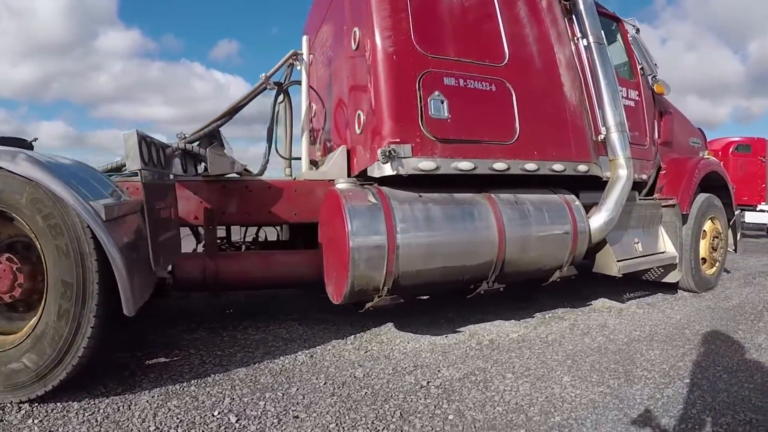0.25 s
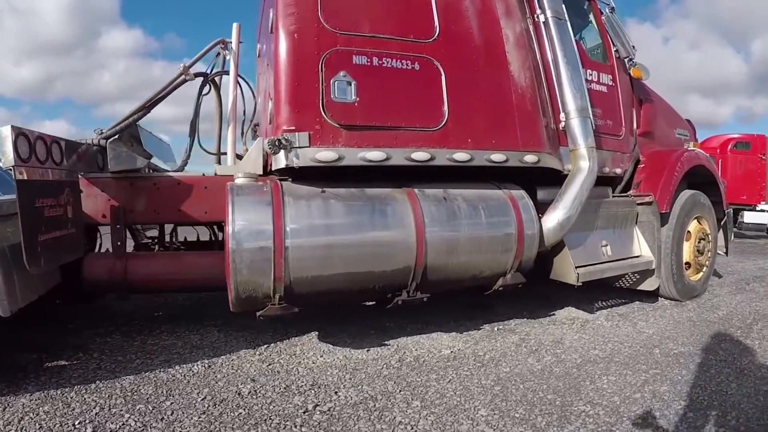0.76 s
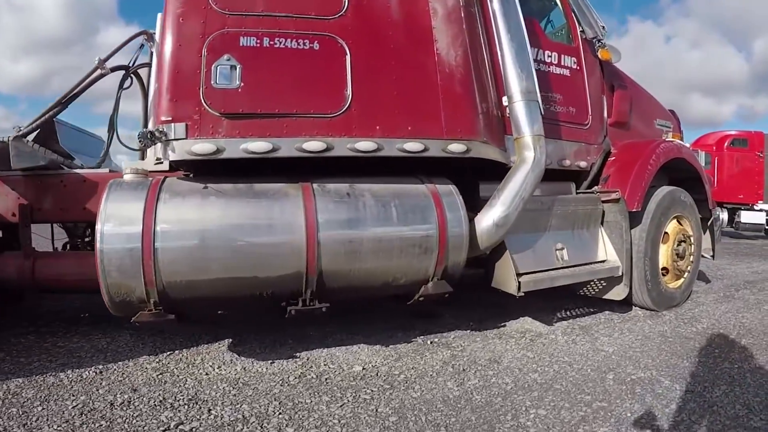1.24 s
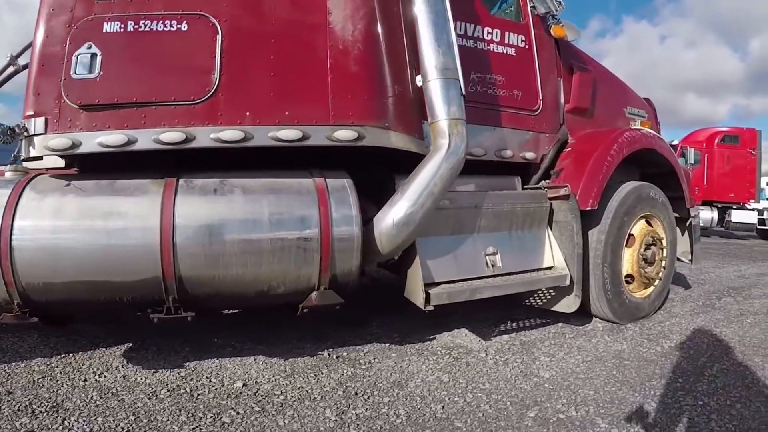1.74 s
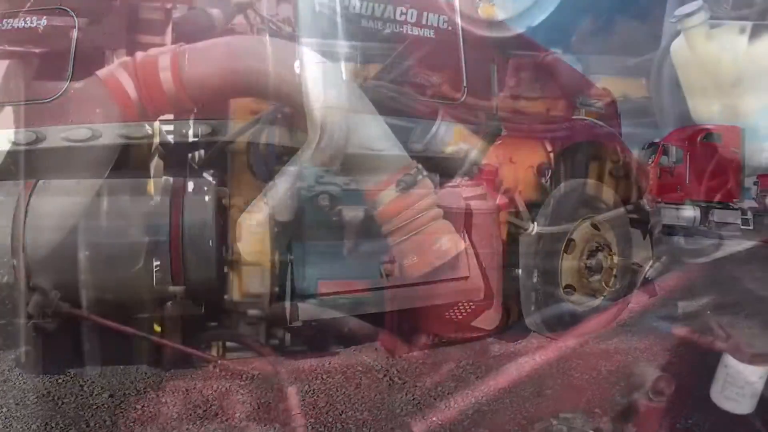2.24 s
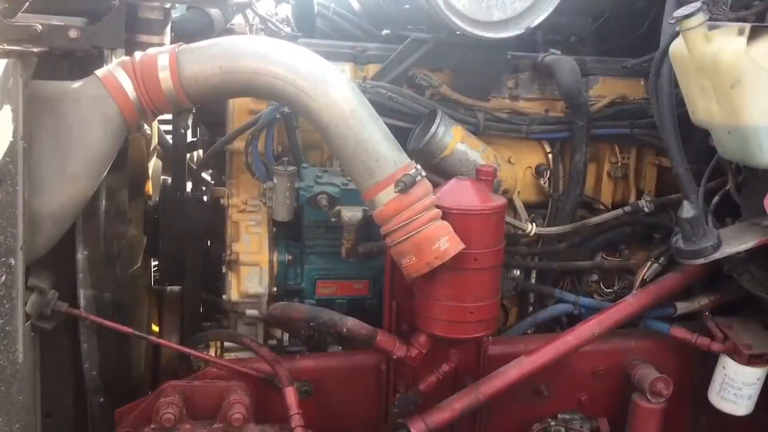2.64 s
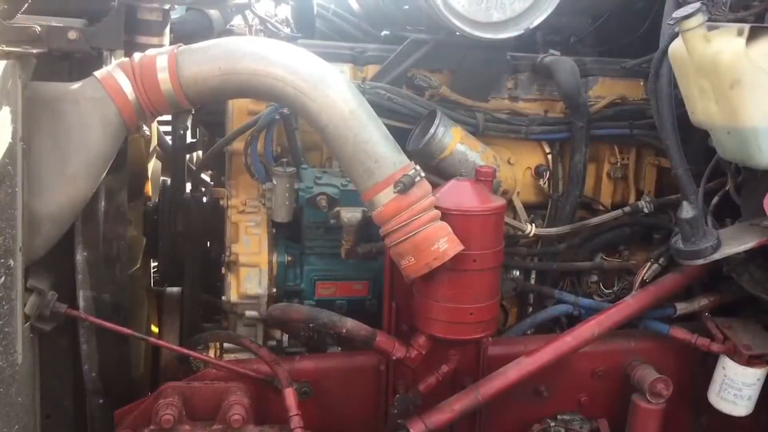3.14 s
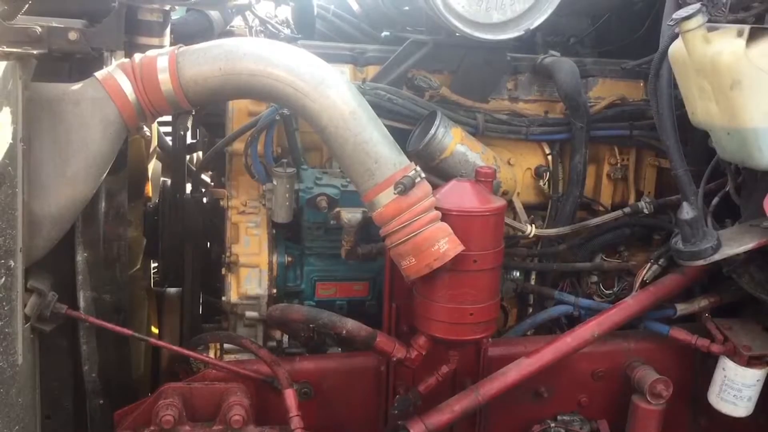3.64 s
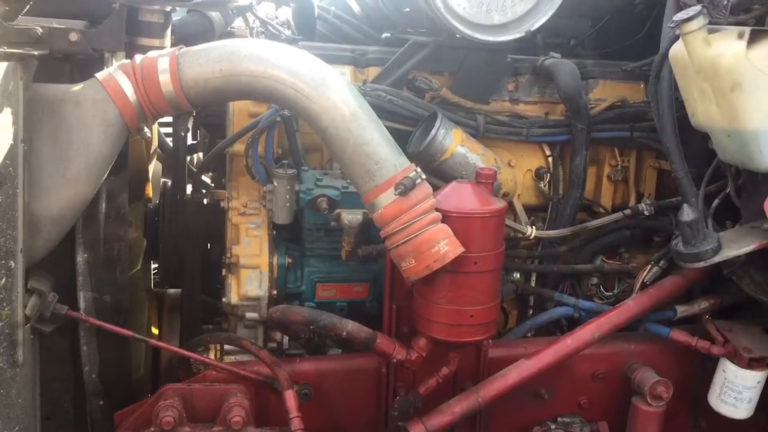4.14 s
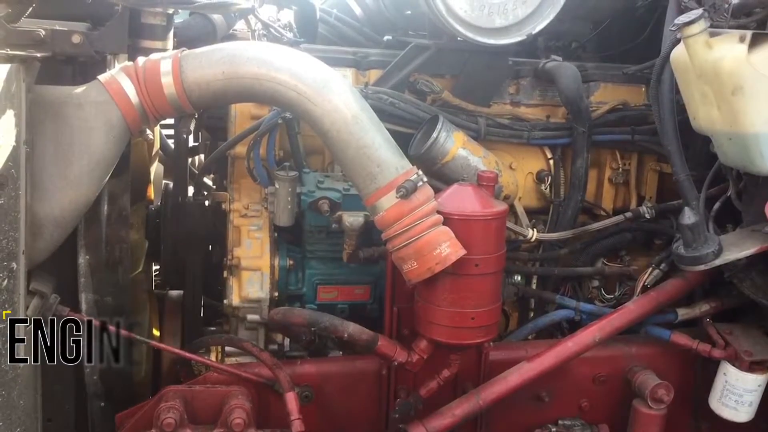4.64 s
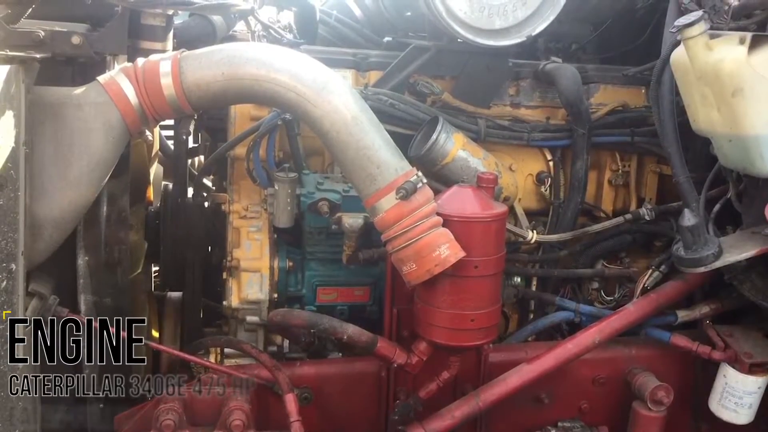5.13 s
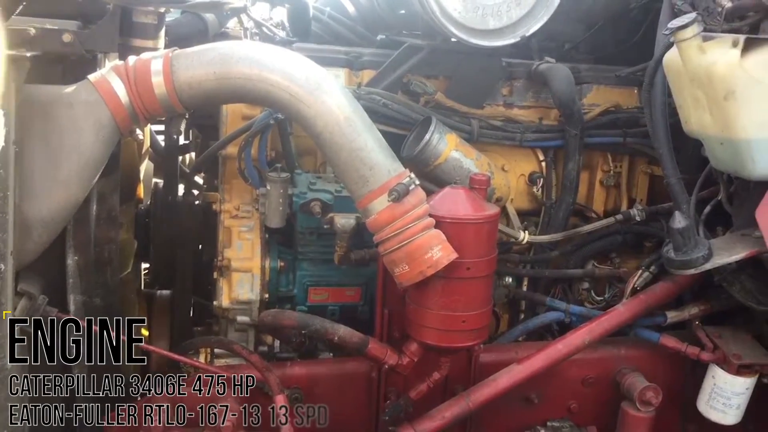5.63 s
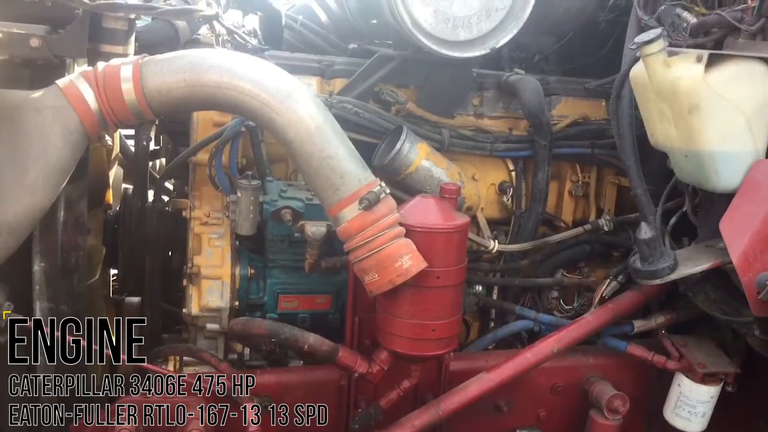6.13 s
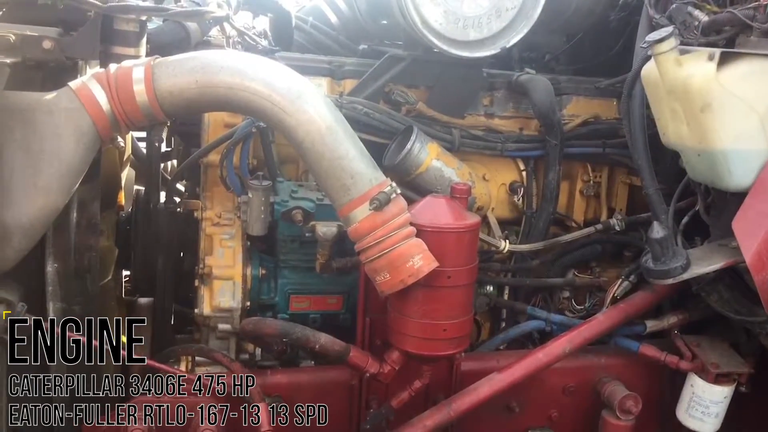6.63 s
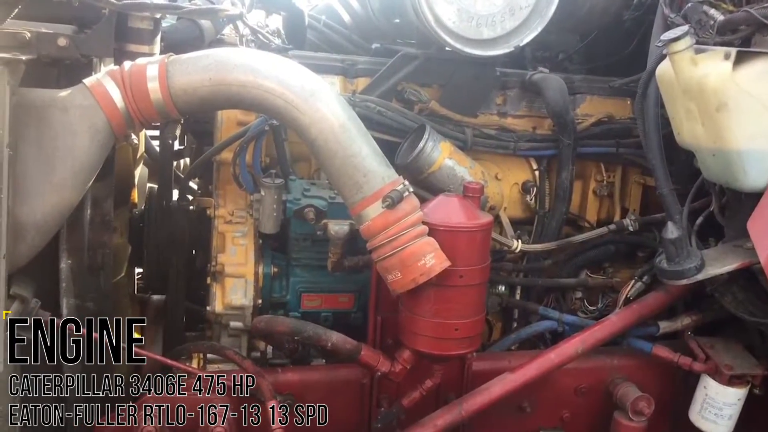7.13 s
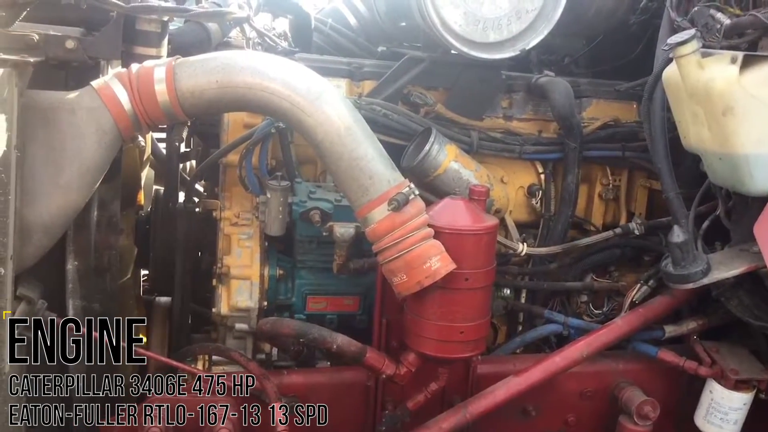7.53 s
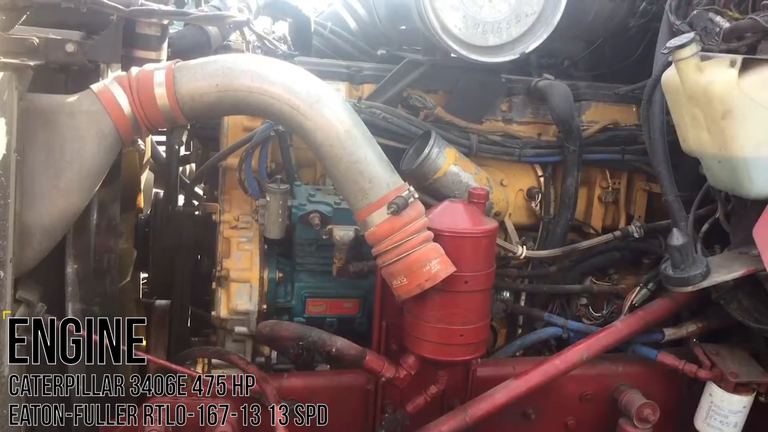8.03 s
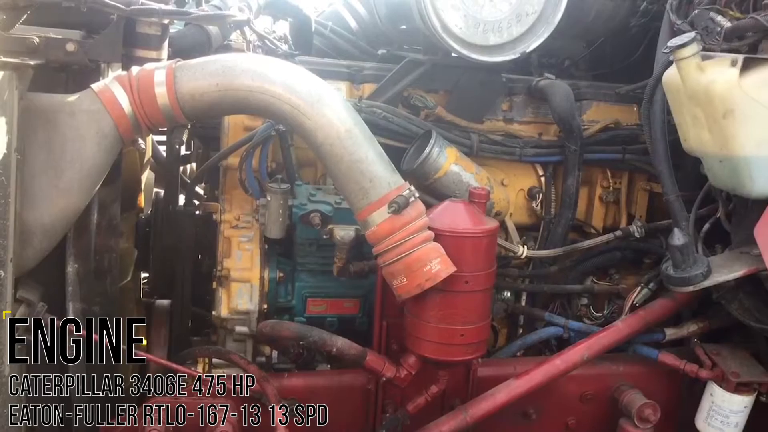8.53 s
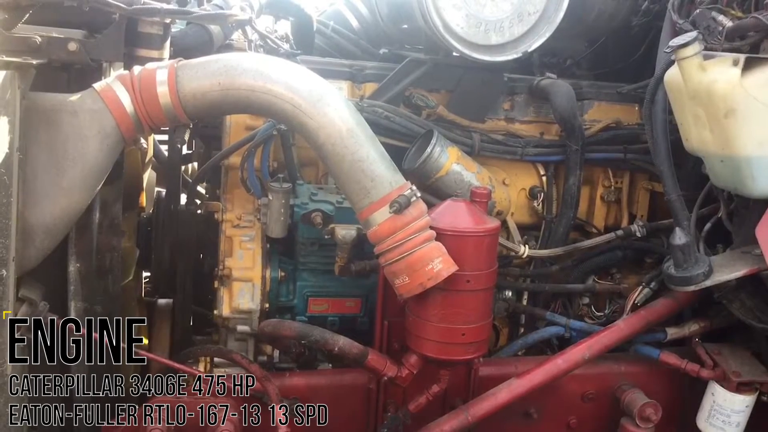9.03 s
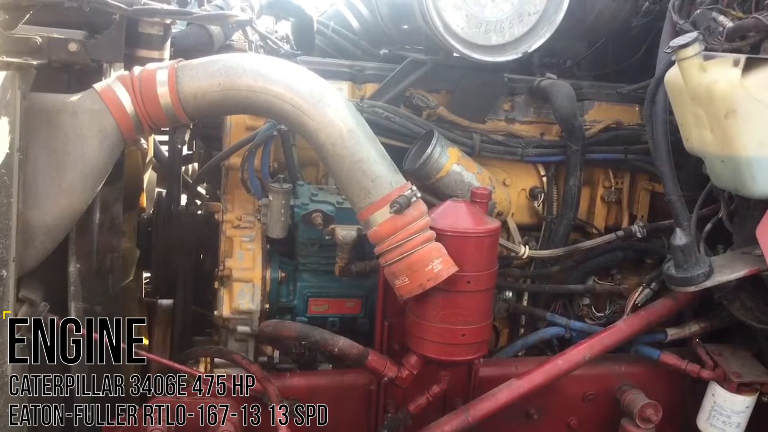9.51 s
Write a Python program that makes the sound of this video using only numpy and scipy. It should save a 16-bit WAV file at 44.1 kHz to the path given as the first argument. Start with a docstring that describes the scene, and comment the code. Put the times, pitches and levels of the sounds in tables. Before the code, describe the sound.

First comes deep, uneven wind buffeting on an outdoor microphone, with barely audible gravel steps, clicking pebbles and a thin distant whine. Around two seconds a heavy six-cylinder diesel fades in as the wind stops. Heard close, it idles evenly with hard metallic clatter, injector ticks, low pulsing drone and fan noise, with an occasional heavier low beat.

```python
"""Wind buffets a microphone in a gravel yard, with a few faint steps, clicking stones and a thin far whine.
As the wind dies, a big six-cylinder diesel idling near 700 rpm fades in over the quiet air of the yard.
Wind, fan and air are filtered noise; steps are noise grains; stones and rough gust tops are ringing noise.
The engine sums noise bursts and swelling tones timed by the firings, a drone of sines on the crank orders,
and resonances of the iron."""
import sys
import numpy as np
from scipy import signal
from scipy.fft import rfft, irfft
from scipy.io import wavfile
from scipy.ndimage import uniform_filter1d

SR = 44100
rng = np.random.default_rng(int(sys.argv[2]) if len(sys.argv) > 2 else 0)


def waveform_to_disk(signal):
    """Save audio, clipped to [-1, 1], as 16-bit WAV at the path in sys.argv[1]."""
    frames = np.transpose(np.atleast_2d(signal))
    scaled = np.clip(frames, -1, 1) * 32767
    samples = np.round(scaled).astype(np.int16)
    wavfile.write(sys.argv[1], SR, samples)


N = 430857
TIME = np.arange(N) / SR
ENGINE_FADE_START_S = 1.837


def undb(db):
    """Decibels to gain."""
    return 10 ** (np.asarray(db) / 20)


def level(x, db):
    """Scale to an rms level."""
    return x * undb(db) / np.sqrt(np.mean(x ** 2))


def curve(rows):
    """Second column of a table over its first, joined by straight lines in time."""
    rows = np.array(rows)
    return np.interp(TIME, rows[:, 0], rows[:, 1])


def smooth(x, first, second):
    """Two moving averages in turn, lengths in samples."""
    return uniform_filter1d(uniform_filter1d(x, first), second)


def walk(rate_hz):
    """Random levels drawn rate_hz times a second, smoothed twice, rms 1."""
    k = int(SR / rate_hz)
    held = np.repeat(rng.standard_normal(N // k + 1), k)
    return level(smooth(held, k, k)[:N], 0)


def colour(x, spectrum, size=8192):
    """Minimum-phase filter with the given (frequency [Hz], level [dB]) outline, by folding the cepstrum."""
    hz, db = np.transpose(spectrum)
    bins_hz = np.maximum(np.fft.rfftfreq(size, 1 / SR), 1)
    outline_db = np.interp(np.log(bins_hz), np.log(hz), db)
    cepstrum = irfft(np.log(undb(outline_db)))
    cepstrum[1:size // 2] *= 2
    cepstrum[size // 2 + 1:] = 0
    impulse = irfft(np.exp(rfft(cepstrum)))
    return signal.fftconvolve(x, impulse)[:N]


def ring(x, hz, width_hz):
    """One resonance, gain 1 at its centre."""
    return signal.lfilter(*signal.iirpeak(hz, hz / width_hz, fs=SR), x)


def add(track, start_s, sound):
    """Mix a sound into a track at a given time."""
    i = int(np.clip(start_s * SR, 0, N))
    track[i:i + len(sound)] += sound[:N - i]


def engine(count=6):
    """Six cylinders fire in turn, three to a crank turn; the fan blows on between the firings."""
    first_firing_s, drone_lead_s = .0458, .00199
    # firing rate: (time [s], firings per second [Hz])
    firing_rate = [(0, 35), (8.3, 35), (9.8, 35.08)]
    start_hz = firing_rate[0][1]
    fired = np.cumsum(curve(firing_rate)) / SR - first_firing_s * start_hz + .005 * walk(5)
    times = np.interp(np.arange(int(fired[-1]) + 1), fired, TIME)
    firings = [times[k::count] for k in range(count)]
    turns = (fired + drone_lead_s * start_hz) / (count / 2)
    # fan noise: (frequency [Hz], relative density [dB])
    fan_spectrum = [(150, -18), (400, 3.5), (2500, -4.5), (6500, -11.5), (7500, -18.5), (10000, -38),
                    (13500, -28), (15000, -45)]
    fan = colour(rng.standard_normal(N), fan_spectrum)
    sound = (impacts(firings)
             + combustion_knocks(firings)
             + pings(firings)
             + level(drone(turns), -46)
             + level(fan, -54.5)
             + throbs())
    fade = np.clip((TIME - ENGINE_FADE_START_S) / .68, 0, 1) ** .82
    return sound * undb(-.5) * fade


def impacts(firings):
    """Clatter and injector ticks ring the same iron; low thumps and a loose rattle come on top."""
    # cylinders in firing order: (relative clatter [dB], relative injector tick [dB])
    cylinder_levels = [(1.94, 6), (1.5, 0), (1.84, 4.5), (2, 3.5), (2, 4.5), (1.5, 1.5)]
    # spectra: (frequency [Hz], relative density [dB])
    clatter_spectrum = [(180, -21), (350, -13.5), (550, -10.5), (750, -8.5), (950, -4.5), (1250, -4.5),
                        (1900, -2), (2400, -7), (3500, -15), (4000, -16.5), (6300, -25), (7500, -54),
                        (10000, -65), (15500, -66)]
    injector_spectrum = [(1500, -14), (2600, 1), (3500, 6.5), (4000, -3.5), (6300, -1), (7400, -13),
                         (8500, -14.5), (10000, -27), (13300, -19.5), (14700, -31)]
    thump_spectrum = [(25, -31), (45, -10), (60, 9.5), (110, 2), (165, 7.5), (215, 10.5), (260, 6.5),
                      (330, 5.5), (380, -2), (520, -5.5), (800, -17), (1500, -52)]
    clatter_db, injector_db = np.transpose(cylinder_levels)
    clatter = blows(firings, clatter_db, delay_s=-.0003, rise_s=.0051, decay_s=.027,
                    repeat=.68, scatter_db=.67)
    ticks = blows(firings, injector_db, delay_s=0, rise_s=.00099, decay_s=.018,
                  repeat=.91, scatter_db=1.8)
    # the heavy casting answers later and more slowly than the thin covers
    thumps = blows(firings, clatter_db, delay_s=.00633, rise_s=.0094, decay_s=.021,
                   repeat=.37, scatter_db=2.5)
    # every second firing is followed by a loose, bright rattle
    loose = blows(firings[1::2], clatter_db[1::2], delay_s=.008, rise_s=.0036, decay_s=.015,
                  repeat=.15, scatter_db=4)
    loose = ring(ring(loose, 2670, 1300), 2670, 1300)
    struck = level(colour(clatter, clatter_spectrum), -42.5) + level(colour(ticks, injector_spectrum), -52)
    return iron(struck) + level(colour(thumps, thump_spectrum), -53.5) + level(loose, -53)


def blows(firings, cylinder_db, delay_s, rise_s, decay_s, repeat, scatter_db, blur_hz=2700, size=6000):
    """A noise burst per firing: part is the cylinder's fixed signature, blurred in the treble by play."""
    t = np.arange(size) / SR
    shape = (1 - np.exp(-(t / rise_s) ** 2)) * np.exp(-t / decay_s)
    # share of the power that repeats every cycle
    share = repeat / (1 + (np.fft.rfftfreq(size, 1 / SR) / blur_hz) ** 4)
    out = np.zeros(N)
    for times, db in zip(firings, cylinder_db):
        signature = np.sqrt(share) * rfft(rng.standard_normal(size))
        for s in times:
            fresh = np.sqrt(1 - share) * rfft(rng.standard_normal(size))
            gain = undb(db + scatter_db * rng.standard_normal())
            add(out, s + delay_s, shape * irfft(signature + fresh) * gain)
    return out


def iron(x):
    """Every resonance lifts its own band and rings on after a blow."""
    # block, covers and pipes: (frequency [Hz], width [Hz], lift [dB])
    resonances = [(435, 42, 6), (559, 155, 2), (934, 32, 6.5), (1292, 40, 3), (1476, 47, 9),
                  (1778, 47, 5.5), (1890, 150, 2.5), (2207, 21, 8), (2577, 58, 6.5), (3188, 6.8, 13.5),
                  (3482, 33, 10), (4082, 15, 9), (4400, 46, 8.5), (5210, 79, 5.5), (5490, 41, 7),
                  (5880, 24, 9.5), (7000, 160, 9.5), (7940, 150, 5.5)]
    for hz, width_hz, db in resonances:
        x = x + (undb(db) - 1) * ring(x, hz, width_hz)
    return x


def combustion_knocks(firings):
    """Combustion knocks and piston slaps, at set points of each cylinder's cycle."""
    # (cylinder, delay after firing [s], ring [Hz], relative peak [dB], swell [s])
    knock_rows = [(0, .003, 1660, -36, .001), (0, .0035, 970, -47, 0.0032), (0, .005, 1280, -38.5, 0.0014),
                  (0, 0, 1750, -31.5, 0.001), (0, .0058, 592, -43, .0024), (0, .0112, 1015, -39, 0.0017),
                  (0, .013, 847, -40, 0.0029), (0, .0185, 1970, -45, 0.0027), (0, .0195, 870, -43, 0.0028),
                  (0, 0.025, 615, -48, 0.0027), (0, 0, 445.7, -53.5, 0.014), (1, .003, 1442, -34, 0.0016),
                  (1, .0045, 1900, -37, 0.0017), (1, .0075, 1520, -40, 0.0016),
                  (1, .0083, 1080, -43.5, 0.0021), (1, .01, 2070, -33.5, .0013),
                  (1, .015, 1033, -38, 0.0019), (1, .018, 556, -49.5, 0.0038),
                  (1, .003, 446.6, -49.5, 0.0098), (2, 0.00015, 1490, -39.5, 0.0025),
                  (2, .0045, 1910, -32, 0.0024), (2, .0064, 1410, -34.5, 0.0019),
                  (2, .0094, 588, -42, 0.0017), (2, .012, 718, -45.5, 0.003), (2, .019, 1725, -45, 0.0028),
                  (3, 0.0013, 1190, -45, 0.001), (3, .003, 1796, -31, 0.0015),
                  (3, .007, 540, -45.5, 0.0031), (3, 0.0061, 976, -46.5, 0.0012),
                  (3, .011, 910, -40.5, 0.0032), (3, .0125, 685, -48.5, 0.0016),
                  (4, .0034, 923, -40.5, 0.0015), (4, .0038, 1716, -30.5, 0.0014),
                  (4, .006, 1215, -36.5, 0.0013), (4, 0.027, 2080, -43, 0.0006),
                  (4, .012, 1856, -33.5, 0.0018), (4, .014, 588, -41, 0.0026),
                  (5, .004, 1360, -47.5, 0.00098), (5, 0.0037, 1540, -37, 0.0019),
                  (5, 0.015, 1810, -32.5, 0.0016)]
    return undb(.84) * swelling_tones(firings, knock_rows, detune=.019, scatter_db=1, jitter_s=.00004)


def pings(firings):
    """Injectors and valves ping at their own pitches."""
    # (cylinder, delay after firing [s], ring [Hz], relative peak [dB], swell [s])
    ping_rows = [(0, .0013, 3910, -47, 0.0014), (0, .0017, 5960, -50.5, 0.004),
                 (0, .0055, 3430, -47.5, 0.0038), (1, .003, 3770, -49, 0.0045), (1, .003, 5580, -51, .003),
                 (2, .002, 4404, -47.5, 0.0043), (2, .0024, 5310, -53, 0.0033),
                 (2, .004, 3290, -51, 0.0035), (3, .002, 4940, -63, 0.0015), (3, .002, 6470, -60, 0.0023),
                 (3, .0036, 3353, -41, 0.0038), (3, 0.00153, 2720, -41.5, .0012),
                 (4, .0025, 2974, -41.5, 0.0018), (4, .0022, 5900, -47, 0.00093),
                 (4, .004, 4478, -50, 0.0031), (4, .0045, 5600, -47.5, 0.0025),
                 (4, .0048, 3420, -41, 0.0017), (5, .002, 5370, -54, 0.0026), (5, .003, 6640, -54, 0.0033)]
    return undb(.56) * swelling_tones(firings, ping_rows, detune=.01, scatter_db=2.2, jitter_s=.0002)


def swelling_tones(firings, rows, detune, scatter_db, jitter_s, size=4000):
    """Each blow swells and dies on its own pitch, with pitch, moment and strength varying every time."""
    out = np.zeros(N)
    t = np.arange(size) / SR
    for cylinder, delay_s, hz, db, swell_s in rows:
        times = firings[int(cylinder)]
        shape = (t / swell_s * np.exp(1 - t / swell_s)) ** 2
        for s, (pitch, late, strength) in zip(times, rng.standard_normal((len(times), 3))):
            tone = np.sin(2 * np.pi * hz * np.exp(detune * pitch) * t)
            add(out, s + delay_s + jitter_s * late, shape * tone * undb(db + scatter_db * strength))
    return out


def drone(turns, waver_db=.43, firings_per_turn=3):
    """Exhaust, intake and gear pulsation: wavering sines locked to the crank."""
    # (cycles per crank turn, relative level [dB])
    orders = [(3, -14), (5, -18), (6, 1.5), (9, -2.5), (10, -7.5), (11, -6.5), (11.5, -8), (12, -12.5),
              (13, -12), (15, 2), (18, -10.5), (18.5, -8), (21, -20), (27, -14), (48, -9), (51, -10),
              (55, -12), (60, -14), (80, -8.5)]
    wavers = [undb(waver_db * walk(rate_hz)) for rate_hz in (6, 9, 12)]
    out = np.zeros(N)
    for k, (order, db) in enumerate(orders):
        half_orders = round(2 * order)
        # multiples of the firing rate share one phase and join in a pulse per firing
        off_firing = half_orders % (2 * firings_per_turn) > 0
        phase_turns = half_orders / 2 * turns + rng.random() * off_firing
        out += undb(db) * wavers[k % len(wavers)] * np.sin(2 * np.pi * phase_turns)
    return out


def throbs(hz=76, length_s=.046):
    """Now and then the idle gives a heavier low beat: a short windowed sine."""
    # (middle time [s], relative level [dB])
    beats = [(3.244, -49), (3.786, -42), (5.215, -44), (6.358, -48), (6.529, -50), (8.672, -42),
             (8.986, -44), (9.357, -42)]
    out = np.zeros(N)
    t = np.arange(int(length_s * SR)) / SR - length_s / 2
    for s, db in beats:
        add(out, s - length_s / 2, undb(db) * np.hanning(len(t)) * np.sin(2 * np.pi * hz * t))
    return out


def wind(steepness=10, small_eddies_db=-11, buffet_db=1.17, buffet_rate_hz=40, edge_wander=.18):
    """Eddies on the microphone in random buffets over a deep rumble; smaller eddies reach higher."""
    # spectra: (frequency [Hz], relative density [dB])
    eddy_spectrum = [(20, -35.5), (40, -8.5), (55, 2), (100, -0.5), (170, -4.5), (300, -6), (410, -9.5),
                     (540, -25.5), (900, -15), (1600, -31), (2500, -37)]
    deep_spectrum = [(8, -23.5), (20, -0.5), (32, 0.5), (48, -2), (70, -20.5), (150, -58), (300, -91)]
    # gust strengths: (time [s], relative level [dB])
    eddy_gusts = [(0, -28), (.04, -44), (.09, -34.5), (.135, -41), (.17, -36), (.24, -38.5), (.28, -46),
                  (.33, -36), (.39, -41), (.44, -38), (.49, -43), (.54, -36), (.62, -34.5), (.68, -34),
                  (.71, -28.5), (.79, -36), (.84, -29.5), (.92, -28), (.96, -29.5), (1.08, -30),
                  (1.21, -29), (1.33, -30.5), (1.5, -30.5), (1.58, -29), (1.88, -30.5), (1.97, -33.5),
                  (2.04, -28.5), (2.11, -33.5), (2.17, -54), (2.22, -31), (2.3, -32.5), (2.36, -41),
                  (2.385, -33.5), (2.43, -42.5), (2.5, -38.5)]
    deep_gusts = [(0.0, -45), (0.08, -39), (0.5, -42.5), (0.56, -29.5), (0.72, -43), (1.35, -32),
                  (1.37, -39), (1.76, -30.5), (1.77, -33), (2.31, -39.5), (2.33, -43), (2.49, -38),
                  (2.56, -57), (2.7, -52)]
    # middle of the wandering upper edge: (time [s], frequency [Hz])
    edge_rows = [(0, 80.4), (.5, 96), (.64, 135), (.8, 172), (.97, 212), (1.07, 159), (1.13, 248),
                 (1.22, 287), (1.3, 240), (1.48, 186), (1.6, 232), (1.9, 203), (2.05, 166), (2.15, 85),
                 (2.24, 168), (2.5, 120)]
    edge_hz = curve(edge_rows) * np.exp(edge_wander * walk(buffet_rate_hz))
    hz, s, bins = signal.stft(colour(rng.standard_normal(N), eddy_spectrum), SR, nperseg=2048)
    above = hz[:, None] / np.interp(s, TIME, edge_hz)
    # a steep edge, with weak small eddies reaching beyond it
    gain = 1 / np.sqrt(1 + above ** steepness) + undb(small_eddies_db) / (1 + above ** 2)
    eddies = signal.istft(bins * gain, SR)[1][:N]
    buffets = undb(buffet_db * walk(buffet_rate_hz))
    deep = colour(rng.standard_normal(N), deep_spectrum)
    return gusts(eddies, eddy_gusts) * buffets + gusts(deep, deep_gusts) * undb(1)


def gusts(eddies, rows, dying_db_per_s=400):
    """Level the eddies so that the gusts set their strength; after the last gust they die away."""
    even = eddies / np.sqrt(smooth(eddies ** 2, 2000, 1200))
    dying_db = dying_db_per_s * np.clip(TIME - rows[-1][0], 0, 1)
    return even * undb(curve(rows) - dying_db)


def steps():
    """Steps crush many small gravel grains in fits and starts."""
    rise_s, crush_db, largest_grain_db = .0053, 4, 20
    # crushed grains: (frequency [Hz], relative density [dB])
    crunch_spectrum = [(600, -11), (1500, 8), (2800, -1.5), (4500, -1), (7000, 1), (10000, -5),
                       (14000, -18)]
    # shoes on gravel: (time [s], level [dB], decay [s])
    footfalls = [(0, -54.5, 0.038), (.632, -59.5, 0.042), (1.269, -57, 0.02), (1.3, -64, 0.028)]
    grain_db = np.minimum(5.1 * rng.exponential(size=N), largest_grain_db) + crush_db * walk(250)
    grains = rng.standard_normal(N) * undb(grain_db)
    load = np.zeros(N)
    for s, db, decay_s in footfalls:
        age_s = np.maximum(TIME - s, 0)
        load += undb(db) * (1 - np.exp(-age_s / rise_s)) * np.exp(-age_s / decay_s)
    return level(colour(grains, crunch_spectrum), 0) * load


def stones_and_gust_tops(pebble_hz=4800, pebble_db=-73, pebble_decay_s=.0058, count=9):
    """Loose stones click, pebbles settle at random and gusts roughen: ringing, decaying noise."""
    # the low, longer bursts near 1.2 and 1.5 s are the rough upper noise of wind gusts, the rest stones:
    # (time [s], ring [Hz], level before decay [dB], decay [s])
    burst_rows = [(0.31, 555, -72, .012), (0.325, 4200, -66, .004), (0.47, 5000, -59, 0.0042),
                  (0.755, 6500, -67, .008), (0.953, 4300, -66, .004), (1.128, 4300, -63, 0.004),
                  (1.195, 810, -55, 0.017), (1.198, 1400, -67, 0.088), (1.308, 7950, -58, 0.0064),
                  (1.457, 6500, -68, .004), (1.5, 810, -64.5, 0.032), (1.608, 1300, -66, .008),
                  (1.707, 1900, -70, .006)]
    # pebbles spread over an octave about pebble_hz
    pebbles = [(when * ENGINE_FADE_START_S, pebble_hz * 2 ** (pitch - .5), pebble_db, pebble_decay_s)
               for when, pitch in rng.random((count, 2))]
    out = np.zeros(N)
    t = TIME[:SR // 10]
    for s, hz, db, decay_s in [*burst_rows, *pebbles]:
        burst = ring(ring(rng.standard_normal(len(t)), hz, hz / 3), hz, hz / 3)
        add(out, s, level(burst, db) * np.exp(-t / decay_s))
    return out


def yard(whine_hz=1184, wander_hz=9, waver_db=1, fade_db_per_s=.5):
    """Quiet open air, as noise, with a thin far-off whine that wavers and slowly fades."""
    # open air: (frequency [Hz], relative density [dB])
    air_spectrum = [(290, -43), (500, -7.5), (909, -1), (1080, -15), (1190, -3), (1280, -5), (3140, -15),
                    (8860, -10.5), (10800, -16), (12500, -26), (15000, -52)]
    air = colour(rng.standard_normal(N), air_spectrum) * undb(walk(15))
    phase_turns = np.cumsum(whine_hz + wander_hz * walk(40)) / SR
    whine = np.sin(2 * np.pi * phase_turns) * undb(waver_db * walk(30))
    return level(air, -71.5) + level(whine, -83) * undb(-fade_db_per_s * TIME)


def scene():
    """Engine, wind, steps, stones and yard air on one channel."""
    return (engine() + wind() + steps() + stones_and_gust_tops() + yard())[None]


def record(dry, top_hz=15700):
    """The recorder cuts the top with a steep low-pass."""
    return signal.sosfilt(signal.ellip(10, .2, 80, top_hz, fs=SR, output="sos"), dry)


dry = scene()
out = record(dry)
waveform_to_disk(out)
```